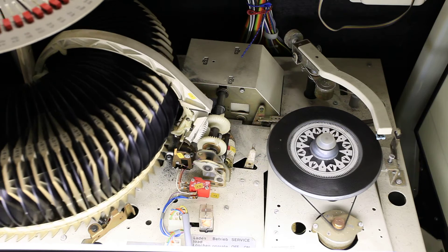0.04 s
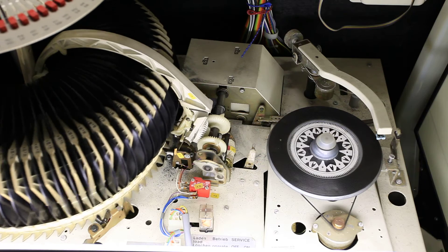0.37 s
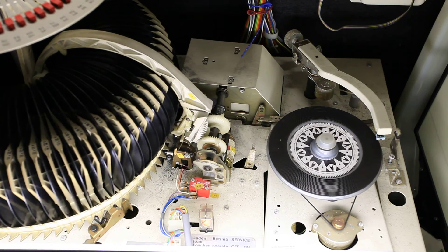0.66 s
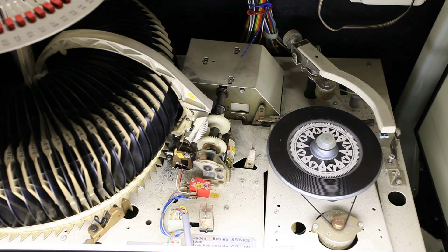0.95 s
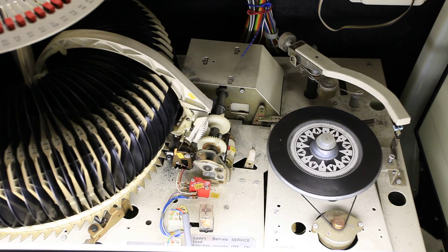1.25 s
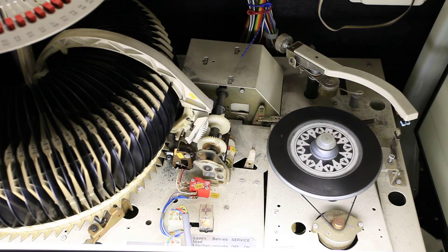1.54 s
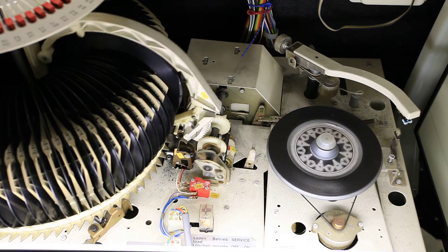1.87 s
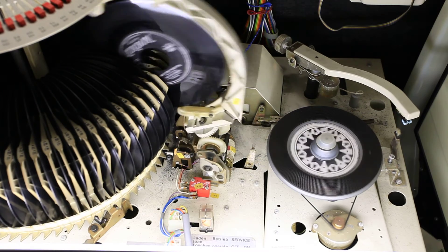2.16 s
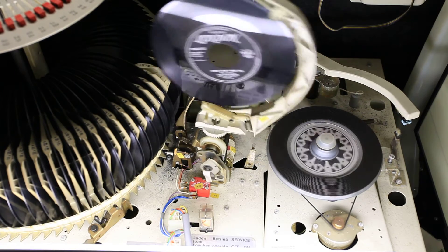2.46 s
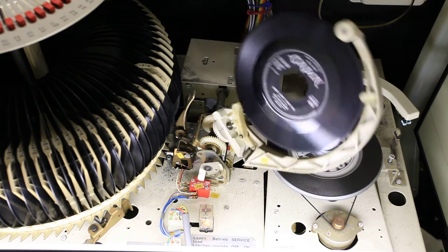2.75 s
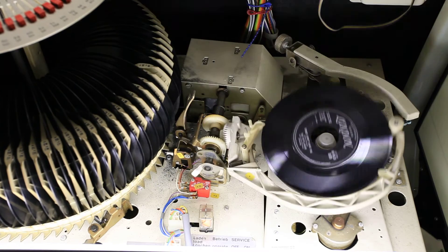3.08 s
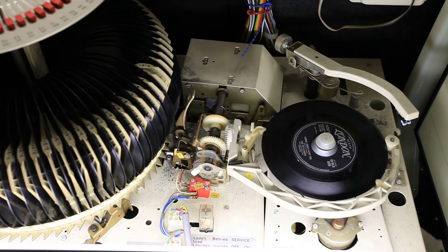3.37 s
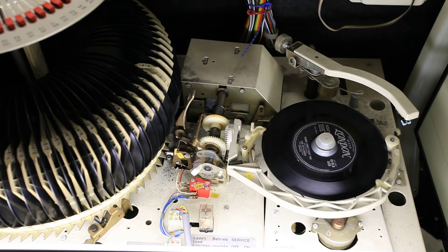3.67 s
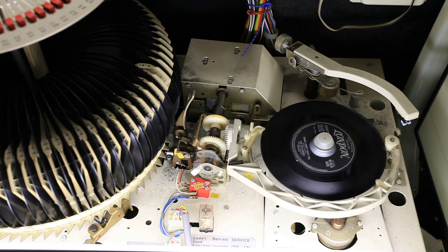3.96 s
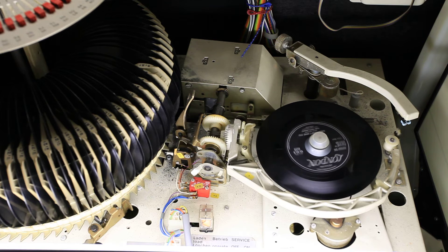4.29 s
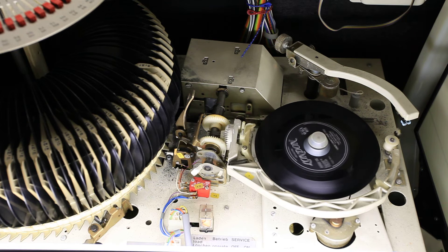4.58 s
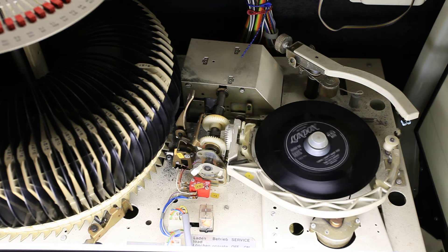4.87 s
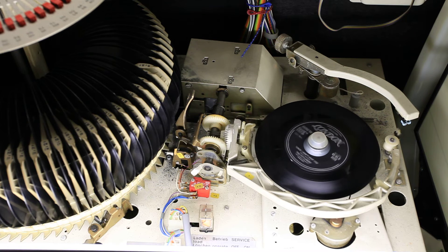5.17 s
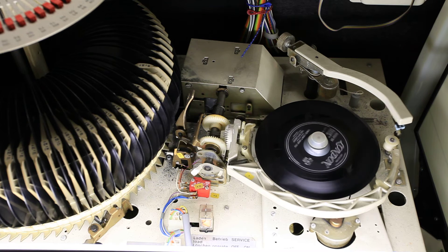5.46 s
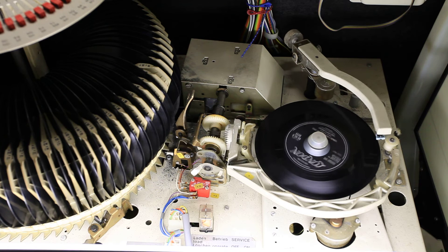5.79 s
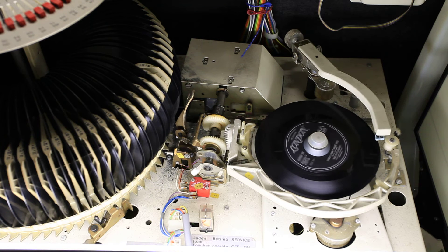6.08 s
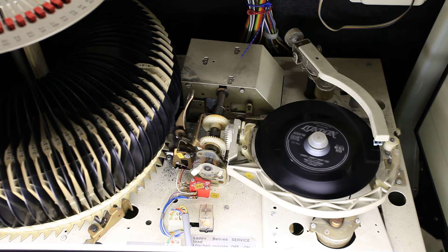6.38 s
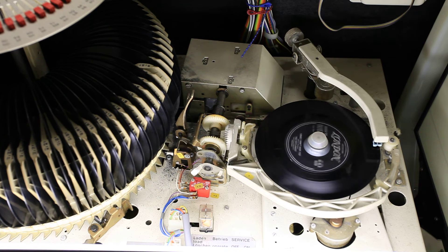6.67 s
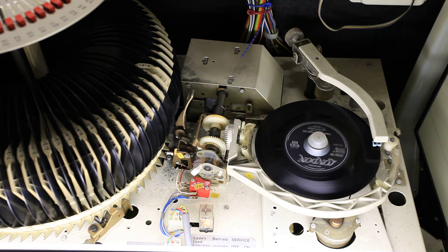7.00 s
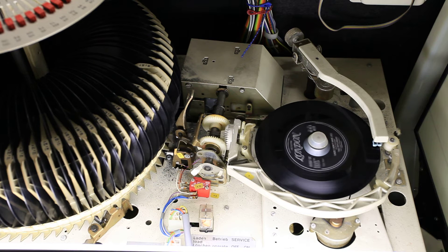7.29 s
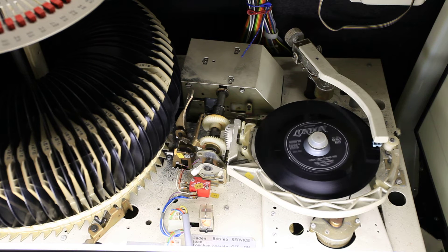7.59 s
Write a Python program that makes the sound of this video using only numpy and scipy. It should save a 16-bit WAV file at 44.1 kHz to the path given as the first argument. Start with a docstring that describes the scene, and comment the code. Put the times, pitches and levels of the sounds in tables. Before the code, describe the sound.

A jukebox changes a record up close: a small geared motor whirs under sharp metal clacks and clicks, then stops with a dull thud.

```python
"""A jukebox changes a record, heard close above the open mechanism.
Over mains hum the carousel rattles and latches; a geared motor spins up at 0.4 s.
Levers clack on the steel chassis, heavy parts bump the cabinet, the disc slides out at 1.7 s.
The motor's whir follows the cam load, sagging after 3.1 s. At 4.4 s the gripper opens and a dry
pivot squeaks. At 7 s the motor is cut and runs down to a dull thud."""
import sys
import numpy as np
from scipy import signal
from scipy.fft import rfft, irfft, next_fast_len
from scipy.io import wavfile
from scipy.ndimage import uniform_filter1d

SR = 44100
rng = np.random.default_rng(int(sys.argv[2]) if len(sys.argv) > 2 else 0)


def generate_wav(signal):
    """Clip the signal to [-1, 1] and save it as 16-bit WAV at the path in sys.argv[1]."""
    frames = np.transpose(np.atleast_2d(signal))
    scaled = np.clip(frames, -1, 1) * 32767
    pcm = np.round(scaled).astype(np.int16)
    wavfile.write(sys.argv[1], SR, pcm)


N = 341334
TIME = np.arange(N) / SR

# rack rattle, room air, deck rumble spectra: f/Hz, level/dB
RACK_SPECTRUM = [(60, -12.5), (250, -6.5), (500, -3.5), (1000, -2), (1700, -7), (2300, 0.5), (2750, 1),
                 (3200, -4.5), (4200, -6.5), (6300, -2), (7600, -10), (9000, -21), (15000, -35)]
AIR_SPECTRUM = [(15, -63), (25, -38.5), (93, -4.5), (146, -8), (196, -19), (250, -24.5), (769, -26),
                (1000, -23), (1150, -18.5), (15000, -28.5)]
RUMBLE_SPECTRUM = [(22, -5), (45, -3), (75, -6)]
# mains harmonics: f/Hz, level/dB
HUM_TONES = [(100, -50.5), (200, -53), (300, -77.5), (400, -81.5), (500, -98.5), (1000, -74)]
# hum contour: t/s, gain/dB
HUM_GAIN = [(0, 0.5), (1.1, -12), (1.4, -0.5)]
# sprung deck swaying as its load shifts: t/s, hold/s, level/dB, t60/s
DECK_SWAYS = [(2.2, 0.74, -68, 1.1), (5.303, .14, -62, 1.1)]
# catches, cam followers, gripper: t/s, level/dB, body/dB, ping/dB, edge/dB
SINGLE_BLOWS = [(0.0433, -32.5, -10, -17, -31), (0.1018, -32, -4, -2, -9), (0.2421, -28.5, -11, -15.5, -20),
                (0.3512, -6.5, -21, -2.5, -24), (0.499, -6.5, -19, -3.5, -21), (1.213, -25.5, -23, -4, -27),
                (1.297, -28.5, -14, 3, -22), (1.4812, -20, -26, -14, -8), (1.8332, -17.5, -17, -10, -24),
                (1.8846, -1, -23.5, -6.5, -10.5), (2.1593, -26, -7.5, -8, -25),
                (2.178, -19, -18, -8.5, -13), (2.3048, -26, -21, -9, -18), (2.531, -27.5, -17, -8, -9),
                (3.8765, -17.5, -21.5, -9, -26), (3.9604, -28, -11, -13, -30), (5.219, -27, -24, -2, -12),
                (5.4879, -29.5, -31, -2, -16), (6.9858, -10.5, -26.5, -4.5, -7.5)]
# bouncing levers: t/s, level/dB, body/dB, ping/dB, edge/dB, count, gap/s, step per rebound/dB
REBOUNDS = [(0.3624, 8, -21.5, -6.5, -8, 3, 0.0087, -0.5), (0.4511, -1, -20.5, -5, -26, 3, 0.011, 1.5),
            (3.2078, 0.5, -20.5, -0.5, -14, 2, 0.031, -2), (4.4079, -8, -29.5, -1.5, -7, 3, .0065, 3),
            (4.4335, 5.5, -30.5, -7, -12, 12, .0155, -2), (5.235, -3.5, -28.5, 1, -4.5, 3, .0165, -0.9)]
# base spectrum of a blow: f/Hz, level/dB
BLOW_SPECTRUM = [(35, -50), (60, -19), (163, -10.5), (259, -14.5), (351, -3.5), (773, -5.5), (869, 3.5),
                 (1520, -3), (1870, 1), (2410, -9), (4220, -10), (5450, -5.5), (5980, -4), (7540, -3.5),
                 (15500, -34)]
# steel lever modes: f/Hz, relative level/dB, t60/s
LEVER_MODES = [(1010, -16.5, .2), (1940, -13, 0.17), (4950, -0.5, 0.3), (5500, -18, 0.248),
               (5730, -14, .25), (5540, -19, 0.23), (6590, -3, 0.21), (6740, -25.5, .25), (7400, 0, 0.21),
               (7690, -9.5, 0.16)]
# cabinet and room decay: f/Hz, t60/s
ECHO_DECAY = [(100, 0.38), (500, 0.89), (2000, 0.66), (6000, 0.41), (12000, 0.22)]
# cabinet bumps: t/s, level/dB, t60/s, deep bass/dB
BUMPS = [(.366, -25, 0.52, -1), (.468, -27, 0.29, -6), (1.895, -37.5, 0.35, -12), (2.516, -36, 0.21, -6),
         (3.209, -37, 0.7, -18), (4.437, -28.5, 0.22, -4), (5.249, -36, 0.44, -3), (7.312, -23.5, 0.13, 4),
         (7.36, -35.5, 0.17, 2.5)]
# bump spectrum: f/Hz, level/dB
BUMP_SPECTRUM = [(25, -6.5), (70, -8.5), (130, -3.5), (200, -3.5), (330, -1.5), (520, -10.5), (950, -19),
                 (1500, -28.5), (4000, -36.5), (6500, -27.5), (12000, -54.5)]
# latch, disc, gripper sliding: t/s, hold/s, level/dB, t60/s
SLIDE_STROKES = [(0.446, 0.088, -19.5, 0.44), (1.686, 0.21, -37.5, 1.2), (4.442, 0.18, -31, .22)]
# spectra of the sliding hiss and of its unevenness: f/Hz, level/dB
SLIDE_SPECTRUM = [(700, -4.5), (3500, 5), (8000, 6), (11000, -11), (15500, -17)]
CATCH_SPECTRUM = [(8, 3.5), (200, -16.5)]
# frame drone, gear whine, brush rasp, brush chatter, speed flutter spectra: f/Hz, level/dB
DRONE_SPECTRUM = [(130, -26), (210, -5), (270, -15), (360, 1), (420, -9), (570, -4.5), (680, -5.5),
                  (1000, -4), (1600, -6.5), (1900, 2)]
GEAR_SPECTRUM = [(1500, -40.5), (1870, -14), (2010, -4), (2120, -7), (2260, -7), (2370, -4.5), (2490, -4.5),
                 (2720, -17), (2950, -10), (3400, -18.5), (4200, -27)]
RASP_SPECTRUM = [(1880, -25), (3200, -3), (4090, -9.5), (4540, -7.5), (4910, -2), (5320, -4), (6230, -0.5),
                 (6790, -5), (7300, -3), (9200, -20), (10900, -25.5), (12000, -23.5), (13500, -41.5),
                 (15500, -39)]
CHATTER_SPECTRUM = [(5000, -3.5), (5600, 0), (6050, 1), (6350, 2), (6900, -5)]
FLUTTER_SPECTRUM = [(4, 0), (25, -6)]
# cam load changes: t/s, length/s, speed step/(rev/s)
CAM_STEPS = [(2.01, .1, .6), (2.21, .32, 1.53), (3.11, .42, -3.74), (3.38, .31, -6.73), (3.75, .38, 3.96),
             (4.15, .44, -.86), (4.54, .25, .85), (5.13, 1.13, 1.2), (5.17, .28, 2.54), (6.57, .17, -1.36),
             (6.79, .16, .56)]
# steel deck resonances: f/Hz, width/Hz, gain/dB
CHASSIS_MODES = [(219.5, 6.8, 4.5), (359.4, 23, -1.5), (474, 10, 3.5), (2102, 27, 6), (2220, 50, -0.5),
                 (2950, 28, 7), (4820, 70, -1), (5690, 69, -6), (7180, 130, -1.5), (7370, 91, 2),
                 (8700, 110, -4), (9750, 130, -4), (10200, 130, -3.5), (11270, 130, -4), (11700, 200, -3)]
# unbalance and commutator tones, worm gear tones: shaft order, relative level/dB
SHAFT_ORDERS = [(5, -15), (7, -10), (8, -8), (10, -11.5), (12, -9.5)]
WORM_ORDERS = [(40, -2), (42, -14), (43, 0), (45, -1), (47, -9), (48, -9.5), (50, -4.5), (62, -5.5)]
# shaft tones in the deck: t/s, gain/dB
SHAFT_GAIN = [(1, -12), (2.6, -3), (3.6, -27), (4.2, 2), (5.3, 1), (6.2, 2.5), (7, -0.5)]
# motor fade in and out: t/s, gain
MOTOR_FADE = [(.45, 0), (.75, 1), (7.23, 1), (7.29, 0)]
# springs, brackets, panels: t/s, f/Hz, level/dB, t60/s
STRUCK_NOTES = [(0.469, 167, -19.5, 0.38), (1.886, 1010, -21.5, 0.16), (2.179, 3220, -21.5, 0.069),
                (3.877, 1284, -29, 0.11), (3.961, 1645, -28.5, 0.12), (4.453, 4357, -9.5, 0.3),
                (5.25, 343, -28, .3), (5.25, 547, -26, 0.27), (3.211, 160.6, -36.5, 0.56)]
# dry pivot glide: t/s, f/Hz, level/dB
PIVOT_GLIDE = [(4.413, 6980, -22), (4.424, 6824, -5), (4.431, 6410, -12.5), (4.435, 5930, -4),
               (4.441, 5920, 11.5), (4.450, 6474, 8), (4.46, 6740, -23)]

START_S, CUT_S, COAST_S = .36, 7.0, .29
CRUISE_RPS, FREE_RPS, FREE_RANGE_RPS = 48.05, 48.3, 1.6


def amp(db):
    """Decibels to gain."""
    return 10 ** (np.asarray(db) / 20)


def unit(x):
    """Scale to rms 1."""
    return x / np.sqrt(np.mean(x ** 2) + 1e-20)


def at_hz(table, hz):
    """Table value on a log-frequency axis."""
    table_hz, value = np.transpose(table)
    return np.interp(np.log(hz + 1), np.log(table_hz + 1), value)


def follow(table, t=TIME):
    """Each column of a curve at times t."""
    times_s, *columns = np.transpose(table)
    return [np.interp(t, times_s, column) for column in columns]


def colour(x, spectrum):
    """Filter by a spectrum, with steep skirts beyond its ends."""
    size = 2 * next_fast_len(len(x) // 2 + SR // 20)
    hz = np.fft.rfftfreq(size, 1 / SR) + 1
    skirts = 1 / (1 + (spectrum[0][0] / hz) ** 8) / (1 + (hz / spectrum[-1][0]) ** 12)
    return irfft(rfft(x, size) * amp(at_hz(spectrum, hz)) * skirts)[:len(x)]


def noise(spectrum, samples=N):
    """Coloured noise, rms 1."""
    return unit(colour(rng.standard_normal(samples), spectrum))


def add(mix, start_s, sound):
    """Mix a sound in at start_s."""
    part = mix[max(round(start_s * SR), 0):][:len(sound)]
    part += sound[:len(part)]


def strike(t, db, t60_s, rise_s):
    """Impact envelope: fast rise, exponential decay."""
    return amp(db - 60 * t / t60_s) * (1 - np.exp(-t / rise_s))


def stroke(start_s, hold_s, db, t60_s, rise_s=.03):
    """Motion envelope: swell, hold, decay."""
    t = TIME - start_s
    return np.clip(t / rise_s, 0, 1) * amp(db - 60 * np.maximum(t - hold_s, 0) / t60_s)


def carousel(knocks_per_s=240, knock_t60_s=.06):
    """Records jostle in the turning rack, then settle."""
    t = np.arange(SR // 16) / SR
    knocks = (rng.random(N) < knocks_per_s / SR) * rng.random(N)
    energy = abs(signal.fftconvolve(knocks, amp(-60 * t / knock_t60_s))[:N])
    rattle = unit(colour(np.sqrt(energy) * rng.standard_normal(N), RACK_SPECTRUM))
    return stroke(start_s=-.04, hold_s=1.1, db=-36, t60_s=.3) * rattle


def background(rumble_db=-72.5, air_db=-62):
    """Mains hum, rumble of the sprung deck, room air."""
    hum = sum(amp(db) * np.sqrt(2) * np.sin(2 * np.pi * (hz * TIME + rng.random()))
              for hz, db in HUM_TONES)
    sway = amp(rumble_db) + sum(stroke(*row) for row in DECK_SWAYS)
    rumble = sway * noise(RUMBLE_SPECTRUM)
    return hum * amp(follow(HUM_GAIN)[0]) + rumble + amp(air_db) * noise(AIR_SPECTRUM)


def blow(db, body_db, ping_db, edge_db):
    """One burst of chatter: heavy blows have more body, hard ones more ping and edge."""
    t = np.arange(SR // 3) / SR
    low_db, peak_db, high_db = body_db + 8, ping_db + 5, edge_db + 13
    tone = [(30, low_db), (1500, low_db), (3600, -peak_db), (5200, 0),
            (7000, peak_db), (8500, 0), (11500, high_db), (18000, high_db)]
    return colour(noise(BLOW_SPECTRUM, len(t)), tone) * strike(t, db, t60_s=.072, rise_s=.00043)


def clacks(body_step_db=-.27, ticks_per_s=1.2):
    """Single blows, levers losing body as they rebound, ticks from play in the linkage."""
    out = np.zeros(N)
    for start_s, *levels_db in SINGLE_BLOWS:
        add(out, start_s, blow(*levels_db))
    for start_s, db, body_db, ping_db, edge_db, count, gap_s, step_db in REBOUNDS:
        for k in range(round(count)):
            rebound = blow(db + k * step_db, body_db + k * body_step_db, ping_db, edge_db)
            add(out, start_s + k * gap_s, rebound)
    ticks = (rng.random(N) < ticks_per_s / SR) * (TIME < CUT_S)
    tick = blow(db=-33.5, body_db=-23.5, ping_db=-7, edge_db=-19)
    return out + signal.fftconvolve(ticks, tick)[:N]


def lever_ring(blows):
    """Steel levers ring on after each blow."""
    t = np.arange(SR // 2) / SR
    modes = sum(amp(db - 60 * t / t60_s) * np.cos(2 * np.pi * hz * t) for hz, db, t60_s in LEVER_MODES)
    return signal.fftconvolve(blows, modes / np.linalg.norm(modes))[:N]


def cabinet_echoes(x, rise_s=.0018):
    """Dense cabinet and room reflections; treble dies first."""
    hz, t, bins = signal.stft(rng.standard_normal(SR), SR, nperseg=256)
    decay = amp(-60 * t / at_hz(ECHO_DECAY, hz)[:, None])
    tail = signal.istft(bins * decay, SR, nperseg=256)[1]
    tail *= 1 - np.exp(-np.arange(len(tail)) / SR / rise_s)
    return signal.fftconvolve(x, tail / np.linalg.norm(tail))[:N]


def thuds():
    """Heavy parts bump the cabinet: low, damped shudders."""
    t, out = np.arange(SR // 2) / SR, np.zeros(N)
    for start_s, db, t60_s, deep_db in BUMPS:
        bass_shelf = [(10, deep_db), (55, deep_db), (110, 0), (18000, 0)]
        shudder = colour(noise(BUMP_SPECTRUM, len(t)), bass_shelf)
        add(out, start_s, shudder * strike(t, db, t60_s, rise_s=.0037))
    return out


def slides(grain_db=4):
    """Parts scrape unevenly along their guides."""
    catching = amp(grain_db * noise(CATCH_SPECTRUM))
    hiss = unit(colour(catching * rng.standard_normal(N), SLIDE_SPECTRUM))
    return sum(stroke(*row) for row in SLIDE_STROKES) * hiss


def shaft_rps(start_sag_rps=12.2, spin_up_s=.51, brake_rps_per_s=60):
    """Shaft speed: spin-up, a smooth step per change of cam load, coast."""
    rps = CRUISE_RPS - start_sag_rps * np.exp(-(TIME - START_S) / spin_up_s)
    for start_s, length_s, step_rps in CAM_STEPS:
        progress = np.clip((TIME - start_s) / length_s, 0, 1)
        rps += step_rps * np.sin(np.pi / 2 * progress) ** 2
    return rps - brake_rps_per_s * np.clip(TIME - CUT_S, 0, COAST_S)


def drive_gain(rps, base_db, db_per_rps, coast_loss_db):
    """Level tracks shaft speed, then fades ever faster through the coast."""
    coast = np.clip((TIME - CUT_S) / COAST_S, 0, 1)
    return amp(base_db + db_per_rps * (rps - CRUISE_RPS) - coast_loss_db * coast ** 2)


def rubbing(turns, pole_db, grit_db, once, twice):
    """A scrape repeating each turn plus loose grit, pressed once and twice a turn."""
    order = np.arange(2049)
    five_pole = order % 5 == 0
    harmonics = amp(pole_db * five_pole) * (order < 400)
    surface = unit(irfft(harmonics * np.exp(2j * np.pi * rng.random(len(order)))))
    scrape = np.interp(turns, np.arange(len(surface)) / len(surface), surface, period=1)
    pressure = np.exp(once * np.cos(2 * np.pi * turns) + twice * np.cos(4 * np.pi * turns))
    return pressure * (scrape + amp(grit_db) * rng.standard_normal(N))


def shaft_tones(turns, orders):
    """Sines locked to the shaft."""
    return sum(amp(db) * np.sin(2 * np.pi * (round(k) * turns + rng.random())) for k, db in orders)


def chassis(x):
    """The steel deck boosts its resonances."""
    return x + sum(amp(db) * signal.lfilter(*signal.iirpeak(hz, hz / width_hz, SR), x)
                   for hz, width_hz, db in CHASSIS_MODES)


def frame_drone(turns, rps):
    """The frame drones, with unbalance and commutator tones."""
    rub = rubbing(turns, pole_db=10, grit_db=-.5, once=.11, twice=.055)
    drone = unit(chassis(colour(rub, DRONE_SPECTRUM)))
    tones = amp(follow(SHAFT_GAIN)[0]) * chassis(shaft_tones(turns, SHAFT_ORDERS))
    return drive_gain(rps, base_db=-45, db_per_rps=.17, coast_loss_db=24) * (drone + tones)


def gear_whine(turns, rps, unloaded, mesh_db=-.5, unloaded_db=.5, throb_per_rps=.061):
    """Worm teeth whine and grind in their housing, knock twice a turn, throb once a turn under load."""
    teeth = unit(colour(shaft_tones(turns, WORM_ORDERS), GEAR_SPECTRUM))
    sag_rps = np.maximum(CRUISE_RPS - rps, 0) * (TIME > START_S) * (TIME < CUT_S)
    rub = rubbing(turns, pole_db=2.5, grit_db=-3, once=throb_per_rps * sag_rps, twice=.45)
    mesh = amp(mesh_db) * unit(colour(rub, GEAR_SPECTRUM))
    gain = drive_gain(rps, base_db=-40.5, db_per_rps=-.05, coast_loss_db=15)
    return gain * amp(unloaded_db * unloaded) * unit(chassis(teeth + mesh))


def brushes(turns, rps, unloaded, chatter_db=-2, start_hiss_db=26.5, start_hiss_s=.18,
            hush_db_per_s=150.5):
    """Brushes rasp, chatter at light load, hush at the cut; spin-up hiss fades as the latch settles."""
    rub = rubbing(turns, pole_db=11.5, grit_db=-1, once=.08, twice=.077)
    rasp = (1 - .35 * unloaded) * unit(chassis(colour(rub, RASP_SPECTRUM)))
    light_rub = rubbing(turns, pole_db=5, grit_db=-20, once=.4, twice=.2)
    chatter = amp(chatter_db) * unloaded * unit(colour(light_rub, CHATTER_SPECTRUM))
    hiss_boost_db = start_hiss_db * np.exp(-np.maximum(TIME - START_S, 0) / start_hiss_s)
    hush_db = hush_db_per_s * np.maximum(TIME - CUT_S, 0)
    gain = drive_gain(rps, base_db=-38.5, db_per_rps=.46, coast_loss_db=12)
    return gain * amp(hiss_boost_db - hush_db) * (rasp + chatter)


def motor(flutter_depth=.0008):
    """One shaft, its speed fluttering, drives frame, worm gear and brushes."""
    rps = shaft_rps()
    turns = np.cumsum(rps * (1 + flutter_depth * noise(FLUTTER_SPECTRUM))) / SR
    unloaded = np.clip((rps - FREE_RPS) / FREE_RANGE_RPS, 0, 1)
    whir = frame_drone(turns, rps) + gear_whine(turns, rps, unloaded) + brushes(turns, rps, unloaded)
    return follow(MOTOR_FADE)[0] * whir


def twangs():
    """Struck parts, each decaying on one note."""
    t, out = np.arange(SR) / SR, np.zeros(N)
    for start_s, hz, db, t60_s in STRUCK_NOTES:
        add(out, start_s, np.sin(2 * np.pi * hz * t) * strike(t, db, t60_s, rise_s=.0028))
    return out


def pivot_squeak(roughness=.054):
    """Stick-slip in a dry pivot: a brief, unsteady whistle."""
    t, out = np.arange(PIVOT_GLIDE[0][0], PIVOT_GLIDE[-1][0], 1 / SR), np.zeros(N)
    hz, db = follow(PIVOT_GLIDE, t)
    slip = unit(uniform_filter1d(rng.standard_normal(N), size=30))[:len(t)]
    cycles = np.cumsum(hz * (1 + roughness * slip)) / SR
    add(out, t[0], amp(db) * np.sin(2 * np.pi * cycles))
    return out


def scene():
    """Blows, moving parts and their echoes over the hum; mono."""
    blows = clacks() + thuds()
    transients = blows + amp(-28) * lever_ring(blows) + pivot_squeak()
    moving = motor() + carousel() + slides()
    echoes = cabinet_echoes(amp(-12) * transients + amp(-9) * moving)
    return (transients + twangs() + moving + echoes + background())[None]


def record(dry):
    """The loudest blows overload and clip; low-pass at 15.9 kHz."""
    lowpass = signal.firwin(511, 15900, window=("kaiser", 9), fs=SR)
    return signal.oaconvolve(np.clip(dry, -1, 1), lowpass[None], "same")


dry = scene()
out = record(dry)
generate_wav(out)
```